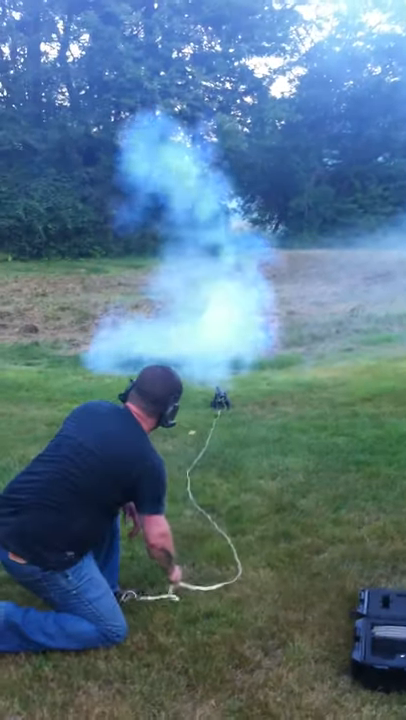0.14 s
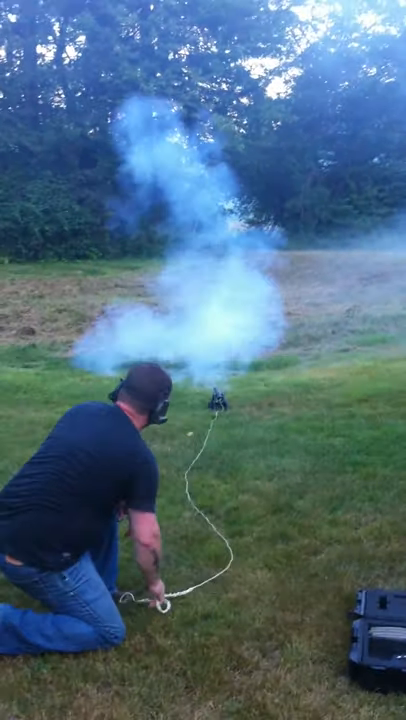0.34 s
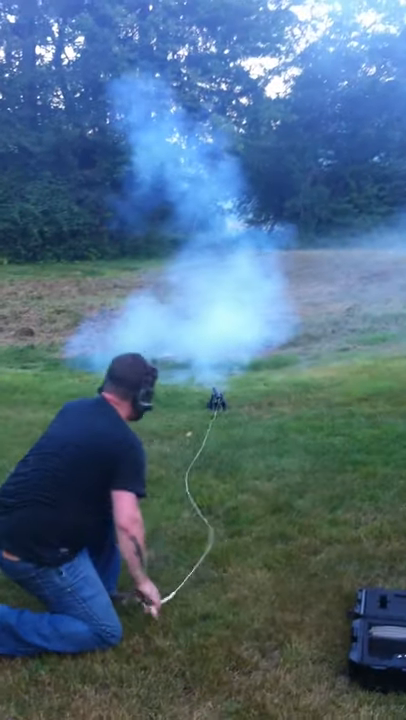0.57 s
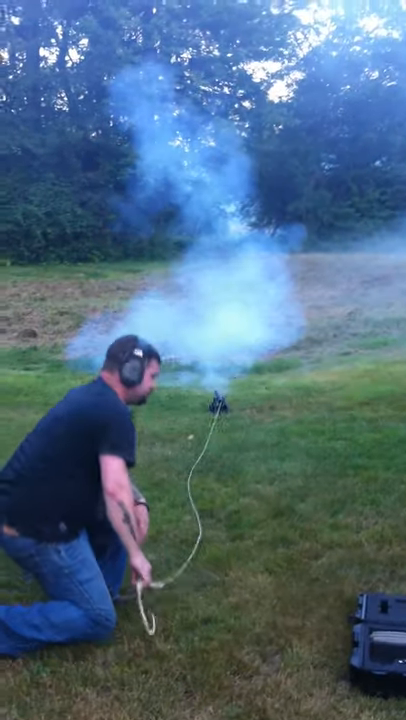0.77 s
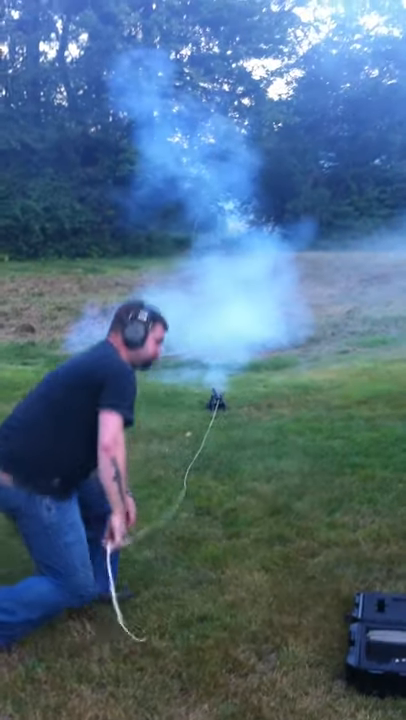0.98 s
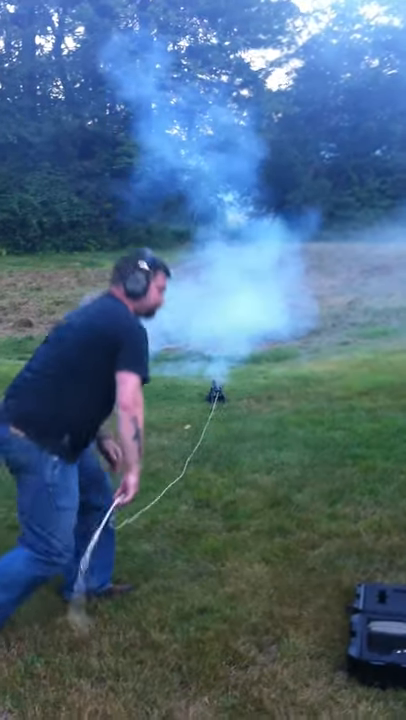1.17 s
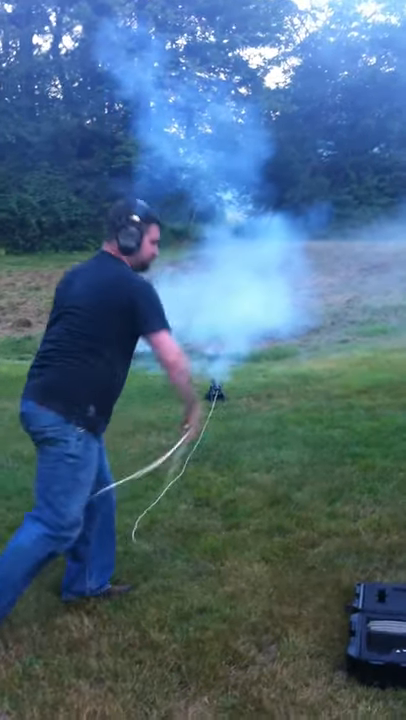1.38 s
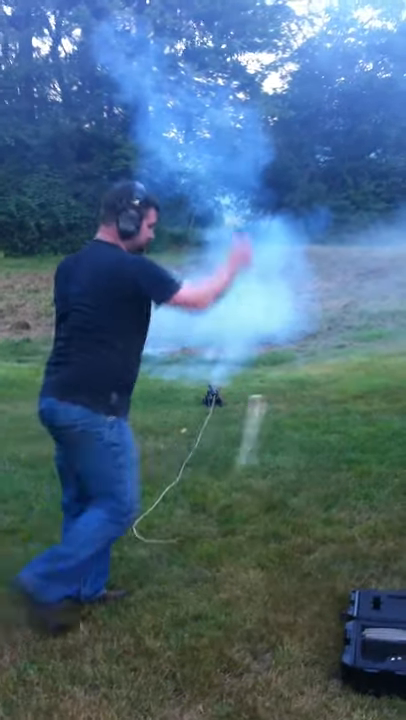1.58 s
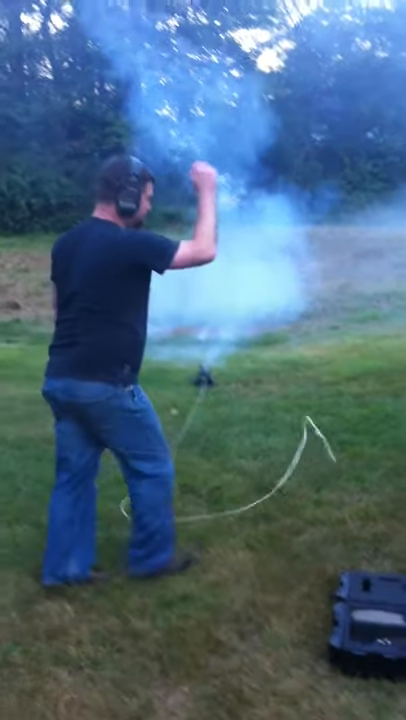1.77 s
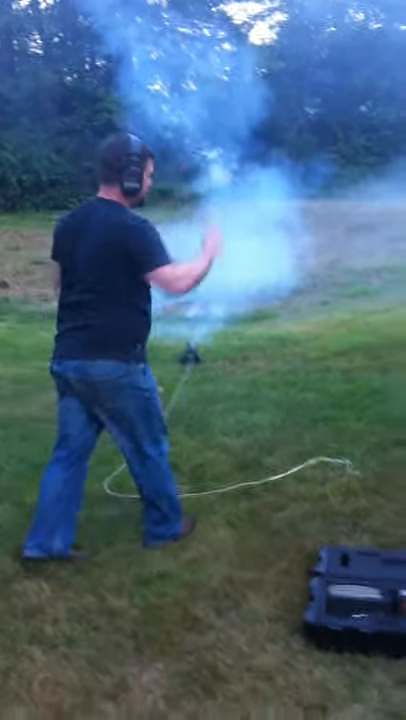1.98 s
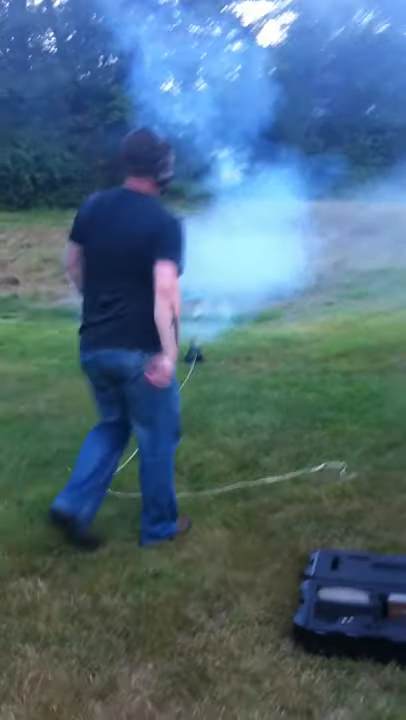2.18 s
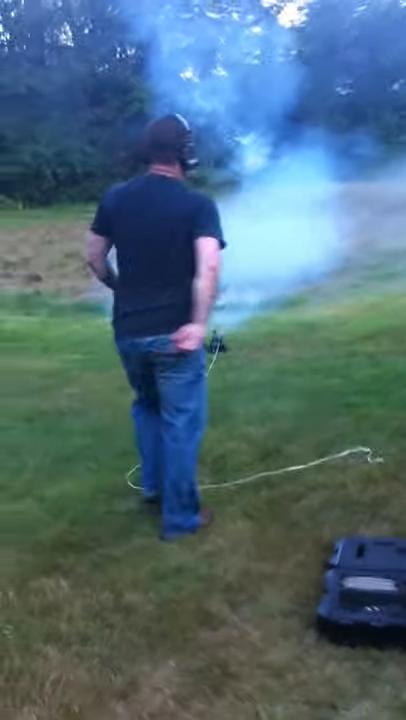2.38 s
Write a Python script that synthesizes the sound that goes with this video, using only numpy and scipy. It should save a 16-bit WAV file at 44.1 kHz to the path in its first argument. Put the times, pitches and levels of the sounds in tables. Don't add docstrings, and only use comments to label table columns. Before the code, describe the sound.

The rolling echo of a small cannon shot, bright and dense at first with low thumps, grows duller and fades over an open field; faint cloth rustle and ticks follow, on a hissy handheld microphone.

```python
import sys
import numpy as np
from scipy import signal
from scipy.fft import rfft, irfft, next_fast_len
from scipy.io import wavfile
from scipy.ndimage import uniform_filter1d

SR = 44100
rng = np.random.default_rng(int(sys.argv[2]) if len(sys.argv) > 2 else 0)


def file_out(sig):
    cols = np.atleast_2d(sig).T
    lim = np.clip(cols, -1, 1)
    pcm = np.round(lim * 32767).astype(np.int16)
    wavfile.write(sys.argv[1], SR, pcm)


def boost(x):
    u = np.asarray(x, float) / 20
    return 10 ** u


N = 107295


def unit(x):
    return x / np.sqrt(np.mean(np.abs(x) ** 2) + 1e-20)


def along(points, hz):
    f, v = np.transpose(points)
    return np.interp(np.log(hz + 1), np.log(f + 1), v)


def filtered(x, response):
    m = next_fast_len(N + 8192)
    return irfft(rfft(x, m) * response(np.fft.rfftfreq(m, 1 / SR)), m)[..., :N]


def coloured_noise(points):
    return unit(filtered(rng.standard_normal(N), lambda hz: boost(along(points, hz))))


def hump(x, centre, width):
    return np.exp(-0.5 * ((x - centre) / width) ** 2)


def smooth_noise(length):
    return unit(uniform_filter1d(rng.standard_normal(N), size=length))


def rings(rows, rise_s):
    out = np.zeros(N + SR)
    t = np.arange(SR // 4) / SR
    onset = 1 - np.exp(-t / rise_s)
    for start_s, peak_db, pitch_hz, t60_s in rows:
        start = round(start_s * SR)
        out[start:start + len(t)] += boost(peak_db - 60 * t / t60_s) * onset * np.sin(2 * np.pi * pitch_hz * t)
    return out[:N]


# delay_s [s], level_db [dB]
LAND_RETURNS = [(0, -34.5), (.15, -36), (.3, -39), (.4, -41), (.55, -38.5), (.75, -39.5), (1, -42),
                (1.2, -44.5), (1.5, -47.5), (1.8, -51), (2.1, -52), (2.43, -54.5)]
# frequency_hz [Hz], level_db [dB]
BLAST_SPECTRUM = [(30, -47), (90, -19), (150, 1), (420, -0.5), (600, -2.5), (1100, -4.5), (6000, -11.5),
                  (14000, -20)]
# frequency_hz [Hz], loss_db_per_s [dB per s of delay]
PATH_ABSORPTION = [(100, -3), (400, -3), (1000, 2), (2000, 5), (4000, 21.5), (8000, 41.5), (15000, 60)]
# delay_s [s], spread_s [s], centre_hz [Hz], spread_octaves [octaves], level_db [dB]
GROVES = [
    (0.14, 0.032, 800, 0.21, 1.5),
    (0.54, 0.068, 350, 0.32, 4),
    (1.6, 0.26, 780, 0.23, 3.5),
    (0.51, 0.11, 90, .5, 5),
    (0.42, 0.2, 2900, 0.19, 4),
]


def echo():
    size_db, patch_db = 1, 0.5
    leaf_hz, leaf_width_hz, leaf_db = 850, 150, 4
    trunks = unit(rng.standard_normal(N) * boost(size_db * smooth_noise(40)))
    hz, t, z = signal.stft(trunks, SR, nperseg=1024, noverlap=896)

    leaf = leaf_db * np.exp(-((hz - leaf_hz) / leaf_width_hz) ** 4)
    top_cut = 12 * np.clip(hz / 1000 - 14, 0, None)
    colour = boost(along(BLAST_SPECTRUM, hz) - top_cut + leaf)
    middle = (hz > 300) & (hz < 1500)
    reference = np.sqrt(np.sum(colour[middle] ** 2) / len(hz))

    patches = uniform_filter1d(rng.standard_normal(z.shape), size=9, axis=0)
    patches = unit(uniform_filter1d(patches, size=24, axis=1))
    level = np.interp(t, *np.transpose(LAND_RETURNS)) + patch_db * patches
    level = level - np.outer(along(PATH_ABSORPTION, hz), t)
    for delay_s, spread_s, centre_hz, spread_octaves, level_db in GROVES:
        octaves = np.log2((hz + 1) / centre_hz)
        level = level + level_db * np.outer(hump(octaves, 0, spread_octaves), hump(t, delay_s, spread_s))
    return signal.istft(z * colour[:, None] / reference * boost(level), SR, nperseg=1024, noverlap=896)[1][:N]


# start_s [s], peak_db [dB], pitch_hz [Hz]
BIG_FACES = [
    (0.029, -18, 141),
    (.092, -21.5, 758),
    (.147, -24.5, 268),
    (.156, -23, 130),
    (.260, -22, 152),
    (0.546, -29, 382),
    (1.05, -26.5, 217),
    (2.282, -33, 186),
]


def thumps():
    t60_s, rise_s = 0.057, 0.005
    return rings([(start_s, peak_db + 2, pitch_hz, t60_s) for start_s, peak_db, pitch_hz in BIG_FACES], rise_s)


# frequency_hz [Hz], level_db [dB]
NEAR_SPECTRUM = [(30, -41), (130, 13.5), (300, -21), (1500, 1), (5000, -13), (12000, -29), (14500, -48),
                 (16000, -60)]


def near_trees():
    level_db, hold_s, fall_db_per_s = -35, 0.17, 48
    t = np.arange(N) / SR
    past_hold_s = np.logaddexp(0, (t - hold_s) * 20) / 20
    return coloured_noise(NEAR_SPECTRUM) * boost(level_db - fall_db_per_s * past_hold_s)


# start_s [s], length_s [s], level_db [dB]
STROKES = [
    (1.77, .3, -68.5),
    (2.16, .035, -72),
    (2.29, .2, -71),
    (1.4, .4, -80),
    (2.02, .3, -75),
]
# frequency_hz [Hz], level_db [dB]
CLOTH_SPECTRUM = [(1500, -30), (3000, -3), (6000, -2), (8000, -4), (12000, 0), (17000, -3)]
# start_s [s], peak_db [dB], pitch_hz [Hz], t60_s [s]
SMALL_TICKS = [
    (.9255, -58, 13000, .002),
    (2.047, -57, 3650, .02),
    (2.1695, -58, 3200, .015),
    (2.1695, -61, 8500, .004),
]


def gunner():
    t = np.arange(N) / SR
    stroke = np.zeros(N)
    for start_s, length_s, level_db in STROKES:
        stroke += boost(level_db) * np.sin(np.pi * np.clip((t - start_s) / length_s, 0, 1)) ** 0.5
    grain = boost(1.9 * smooth_noise(150))
    cloth_response = lambda hz: boost(along(CLOTH_SPECTRUM, hz))
    cloth = unit(filtered(grain * rng.standard_normal(N), cloth_response))

    squeak_s, squeak_length_s, squeak_hz = 2.05, 0.22, 5900
    squeak_db, second_harmonic_db = -77.5, 1
    progress = np.clip((t - squeak_s) / squeak_length_s, 0, 1)
    wander = 1 + 0.015 * smooth_noise(100)
    pitch_hz = squeak_hz * (1 + 0.2 * progress) * wander
    phase = 2 * np.pi * np.cumsum(pitch_hz) / SR
    tone = np.sin(phase) + boost(second_harmonic_db) * np.sin(2 * phase)
    squeak = boost(squeak_db) * np.sin(np.pi * progress) * grain * tone
    return stroke * cloth + rings(SMALL_TICKS, 0.00024) + squeak


# frequency_hz [Hz], level_db [dB]
HUM_SPECTRUM = [(30, -66), (100, -7), (160, 3.5), (500, -21.5), (1500, -25), (3000, -28), (8000, -35),
                (17000, -35)]


def background():
    hum_db, insect_hz, insect_width_hz = -55, 5250, 320
    insect_db, swell_db, swell_s = -80.5, 5, 1.9
    gain_dip_db, gain_back_s = -7.5, 0.66
    t = np.arange(N) / SR
    hum = boost(hum_db) * coloured_noise(HUM_SPECTRUM)
    insects = unit(filtered(rng.standard_normal(N), lambda hz: hump(hz, insect_hz, insect_width_hz)))
    swell = boost(insect_db + swell_db * np.tanh((t - swell_s) * 10))
    gain = boost(gain_dip_db * np.exp(-(t / gain_back_s) ** 2))
    return gain * (hum + swell * insects)


def scene():
    return (echo() + thumps() + near_trees() + gunner() + background())[None]


# time_s [s], edge_hz [Hz]
TREBLE_EDGE = [(0, 15800), (.1, 15000), (.3, 14300), (.45, 14300), (.55, 15500), (.6, 18000)]


def treble_dropouts(x):
    gap_from_hz, gap_share, gap_rest = 6500, 0.4, 0.06
    gap_peak_s, gap_spread_s = 0.68, 0.28
    hz, t, z = signal.stft(x, SR, nperseg=2048)
    edge_hz = np.interp(t, *np.transpose(TREBLE_EDGE))
    share = gap_rest + gap_share * np.exp(-((t - gap_peak_s) / gap_spread_s) ** 2)
    luck = rng.random((len(hz) // 8 + 1, len(t) // 2 + 1))
    luck = np.repeat(np.repeat(luck, 8, axis=0), 2, axis=1)[:len(hz), :len(t)]
    height = np.clip(hz / gap_from_hz - 1, 0, 1)[:, None] ** 0.5
    below_edge = hz[:, None] < edge_hz + 900 * (luck - 0.5)
    keep = below_edge & (luck > share * height)
    return signal.istft(z * keep, SR, nperseg=2048)[1][..., :N]


def band_limit(x):
    return signal.sosfilt(signal.butter(12, 17180, fs=SR, output="sos"), x)


def record(dry):
    low_hz, top_hz = 45.3, 17150
    microphone = lambda hz: (hz < top_hz) * (1j * hz / (low_hz + 1j * hz)) ** 2
    mix = treble_dropouts(filtered(dry, microphone))
    return band_limit(mix)


dry = scene()
out = record(dry)
file_out(out)
```